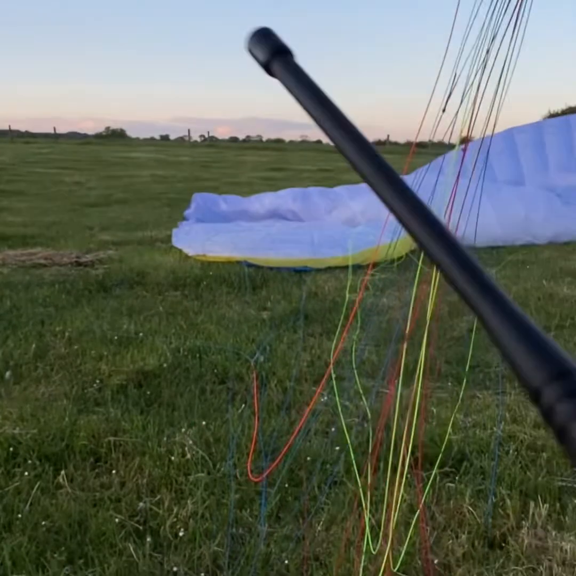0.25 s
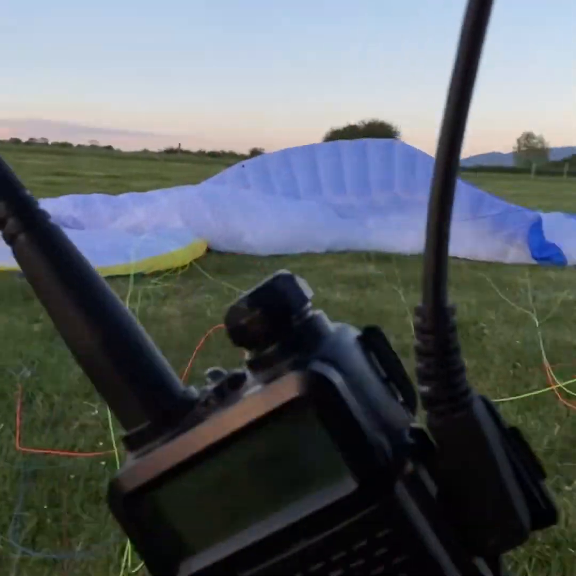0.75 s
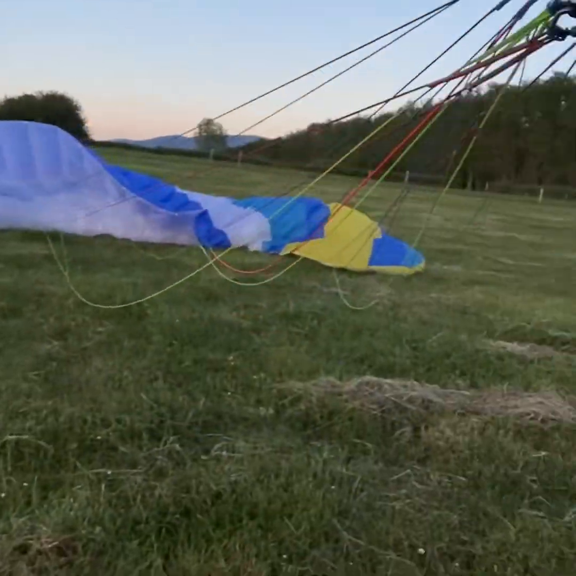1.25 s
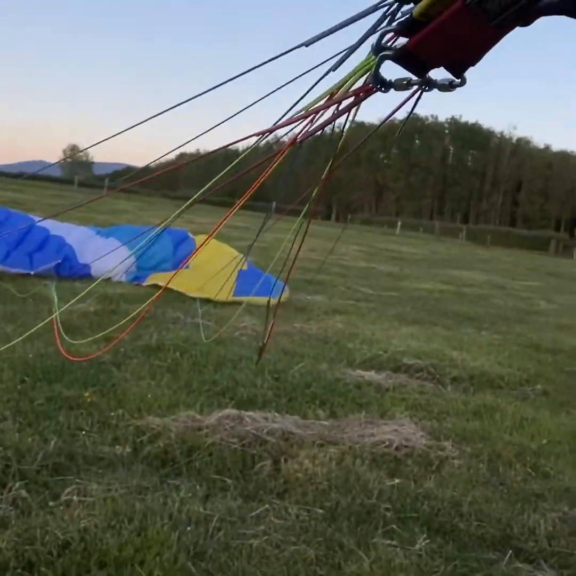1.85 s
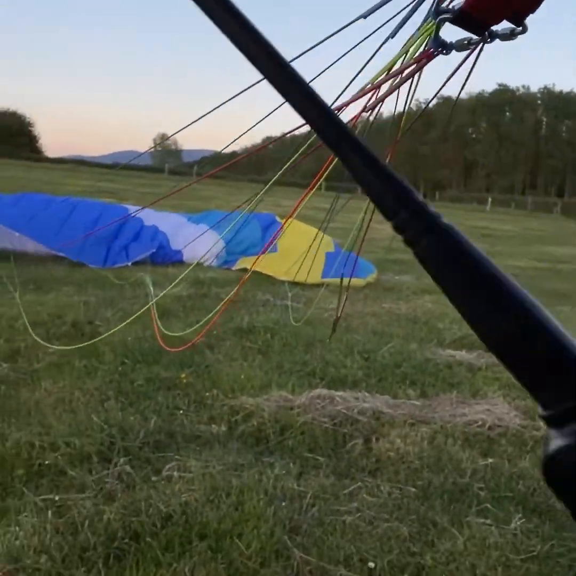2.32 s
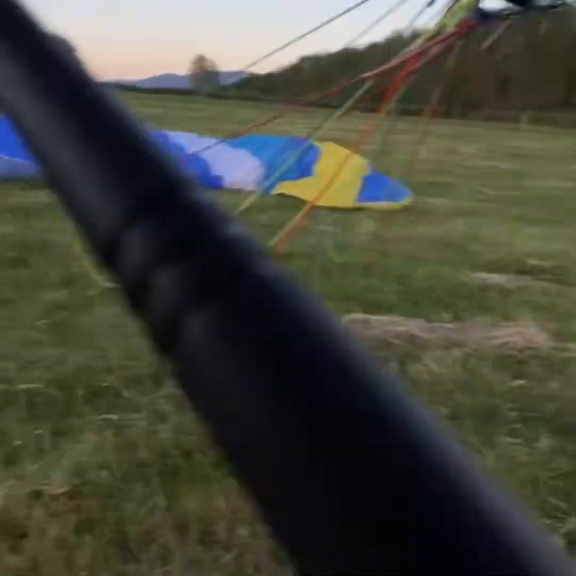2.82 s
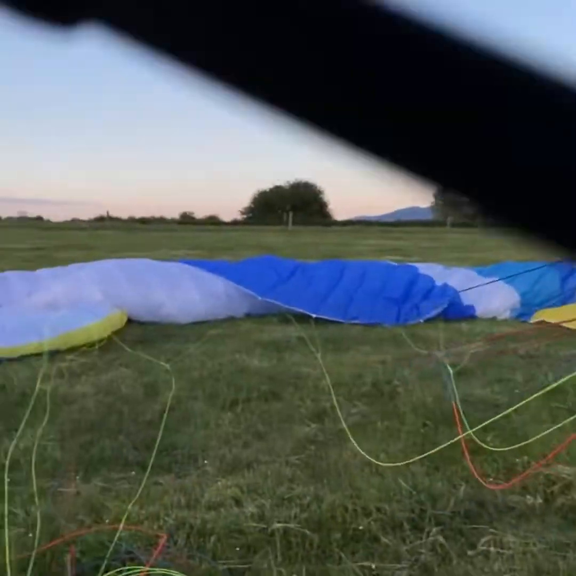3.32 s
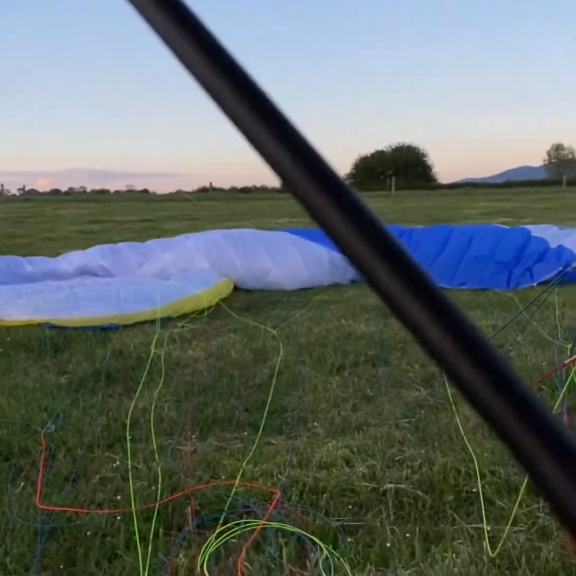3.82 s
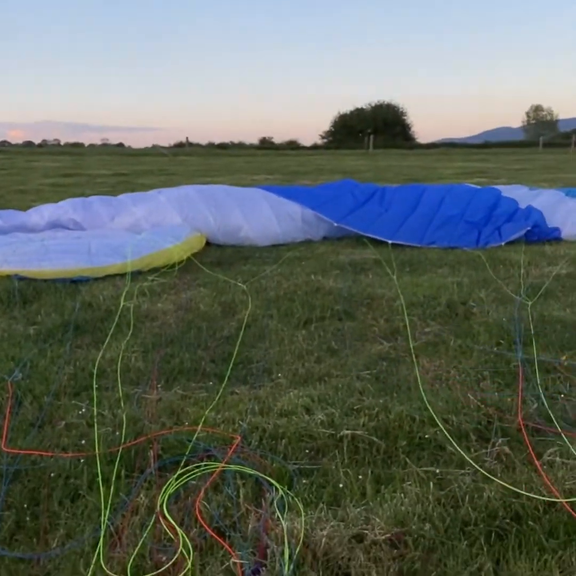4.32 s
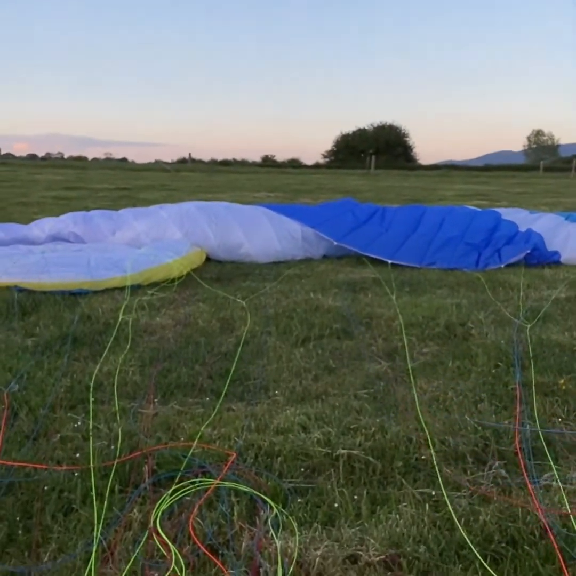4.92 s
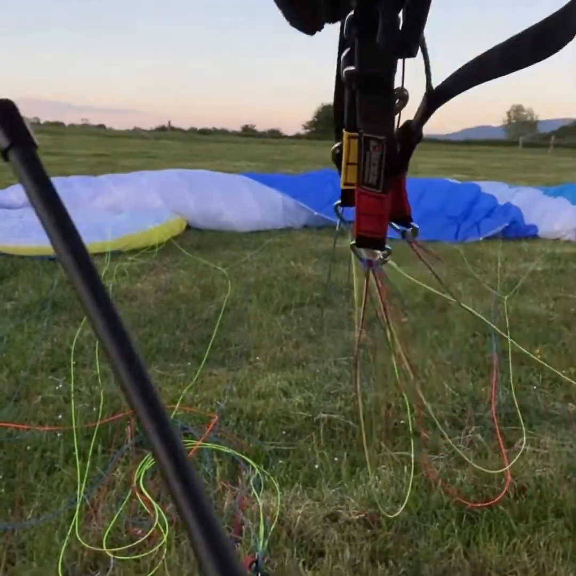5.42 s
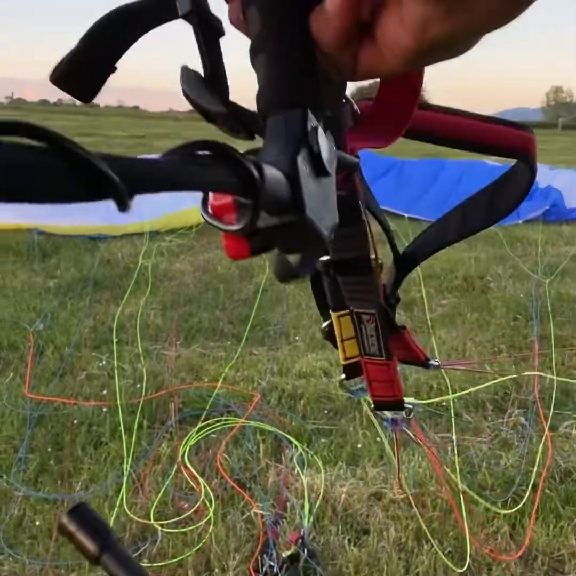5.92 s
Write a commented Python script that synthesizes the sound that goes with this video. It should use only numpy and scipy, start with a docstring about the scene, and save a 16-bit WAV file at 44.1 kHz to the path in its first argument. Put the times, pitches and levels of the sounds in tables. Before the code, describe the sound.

Dry outdoor close-up of harness handling in stereo. Soft fabric rustle and low rumble run throughout over a faint throbbing motor tone. A burst of clicks comes early, then two loud knock clusters with rattling hardware, a single sharp tick and a bright metal clip snap. Quieter afterwards: muffled uneven thuds as the engine bogs down, a soft brush, tiny pings, and the hum climbing back at the end.

```python
"""Harness straps and buckles are handled right at a camera while a small engine on its frame idles unevenly.
From the start webbing rubs and cloth rustles, made of lumpy noise; the engine is a sum of wavering sines.
Soon buckles tick, cloth brushes past and knocks sweep down through the frame: ringing noise and falling tones.
Later a steel gate snaps shut in a few noisy contacts. The engine bogs down twice, each firing jerking the
frame, then picks up again. Loud treble makes the camera turn its gain down for a moment."""
import sys
import numpy as np
from scipy import signal
from scipy.fft import rfft, irfft, next_fast_len
from scipy.io import wavfile
from scipy.ndimage import uniform_filter1d, minimum_filter1d, map_coordinates

SR = 44100
rng = np.random.default_rng(int(sys.argv[2]) if len(sys.argv) > 2 else 0)


def digitize_waveform(pressure):
    """Quantize a signal to 16-bit integers and store it at the path in sys.argv[1].

    Rows of a 2-D input are taken as channels; values are limited to [-1, 1].
    """
    field = np.atleast_2d(pressure).T
    bounded = np.clip(field, -1, 1)
    quanta = np.round(bounded * 32767).astype(np.int16)
    wavfile.write(sys.argv[1], SR, quanta)


N = 271656

# how loudly cloth moves, before its uneven pull: t/s, rustle level/dB, sheen level/dB
CLOTH_LEVEL = [(0, -50, -66), (.4, -56.5, -68), (1.1, -51.5, -60.5), (1.78, -54, -65.5),
               (2.3, -58.5, -70.5), (2.9, -52, -60), (3.55, -54.5, -70), (3.95, -55.5, -63),
               (4.6, -57.5, -69.5), (5.2, -54, -60.5), (6.16, -52.5, -64.5)]


def amp(db):
    """Turn decibels into a factor on the sound pressure."""
    return 10 ** (np.asarray(db) / 20)


def unit(x):
    """Scale a sound to an rms of 1."""
    return x / np.sqrt(np.mean(x ** 2) + 1e-20)


def along(points, hz):
    """Read a curve of (f/Hz, value) points on a log pitch axis."""
    f, v = np.transpose(points)
    return np.interp(np.log(hz + 1), np.log(f + 1), v)


def curves(rows):
    """Give one value per sample for each column after the time."""
    s, *cols = np.transpose(rows)
    return [np.interp(np.arange(N) / SR, s, c) for c in cols]


def wobble(rate, size=N):
    """Draw a smooth random curve with rate knots a second."""
    knots = rng.standard_normal(int(size * rate / SR) + 4)
    return map_coordinates(knots, [np.arange(size) * rate / SR])


def filtered(x, response):
    """Shape the spectrum of x by a complex response of frequency."""
    m = next_fast_len(x.shape[-1] + 2048)
    spectrum = rfft(x, m) * response(np.fft.rfftfreq(m, 1 / SR))
    return irfft(spectrum, m)[..., :x.shape[-1]]


def band(hz, width):
    """Make the response of one resonance; width is a share of its pitch."""
    return lambda f: 1j * f * hz * width / (hz * hz - f * f + 1j * f * hz * width)


def add(out, s, sound):
    """Mix a short stereo sound in at s seconds."""
    part = out[:, round(s * SR):][:, :sound.shape[1]]
    part += sound[:, :part.shape[1]]


def ports(x, alike):
    """Two microphone ports hear a shared part, turned in phase, and the right also hears a part of its own."""
    # how far the left port leads the right: f/Hz, phase/rad
    port_lead = [(100, 0.5), (300, -0.74), (1100, -2), (1800, 0.5), (2900, -2), (3800, 0.5), (5200, -2),
                 (6500, 0.66), (11000, -2), (12500, -4)]
    share = np.clip(alike, 0, 1)
    right = share * x[0] + np.sqrt(1 - share ** 2) * x[1]
    pair = np.array([x[0], right])
    half_each = np.array([[1], [-1]])
    return filtered(pair, lambda hz: np.exp(.5j * along(port_lead, hz) * half_each))


def rush(spectrum, alike, grain_db, grain_rate):
    """Many small rubs blur into stereo noise of rms 1, lumpy at grain_rate a second; no lump stands far out."""
    lumps = amp(2 * grain_db * np.tanh(wobble(grain_rate) / 2))
    noise = rng.standard_normal((2, N)) * lumps
    coloured = filtered(noise, lambda hz: amp(along(spectrum, hz)))
    return unit(ports(coloured, alike))


def handling():
    """Webbing drags on the frame (rumble, rub) and on cloth (rustle, sheen), all with one uneven pull."""
    # shape of each layer's noise, from deep to bright: f/Hz, level/dB
    rumble_shape = [(25, -21), (60, -1), (110, -5.5), (160, -7.5), (320, -20.5), (500, -55)]
    rub_shape = [(120, -120), (200, -5.5), (450, -4), (750, -7.5), (1100, -12), (2000, -120)]
    rustle_shape = [(300, -120), (700, -3.5), (1500, 0), (3000, -2.5), (4500, -6.5), (6000, -20.5),
                    (9000, -120)]
    sheen_shape = [(2500, -120), (4500, -4.5), (6000, -5), (9000, -8), (11000, -7.5), (11800, -5.5),
                   (12900, -120)]
    # rumble before the uneven pull; it drops when the harness settles: t/s, level/dB
    rumble_level = [(0, -46.5), (.65, -46.5), (1.1, -42), (2.3, -42.5), (2.5, -52), (3.3, -53.5),
                    (4.2, -55.5), (4.6, -51.5), (6.16, -48.5)]
    # rub before the uneven pull: t/s, level/dB
    rub_level = [(0, -45.5), (.65, -48), (1.1, -49.5), (1.6, -51), (1.78, -53), (2.5, -59), (3.3, -56.5),
                 (4.2, -64), (4.6, -55.5), (5.8, -50.5), (6.16, -51.5)]
    rumble_db, = curves(rumble_level)
    rub_db, = curves(rub_level)
    rustle_db, sheen_db = curves(CLOTH_LEVEL)
    drag = np.tanh(wobble(21.897))
    rumble = amp(rumble_db + 1.1 * drag) * rush(rumble_shape, .8, 2.2, 30)
    rub = amp(rub_db + 1.3 * drag) * rush(rub_shape, 1.0, 3.6, 90)
    rustle = amp(rustle_db + 2.75 * drag) * rush(rustle_shape, 0.23, 2.07, 250)
    sheen = amp(sheen_db + 2.3 * drag) * rush(sheen_shape, 0.89, 2.7, 300)
    return (rumble + rub + rustle + sheen) * amp([[.8], [-.8]])  # left a little louder, dB


def engine(rows, upper_db):
    """Multiples of the shaft's turning sound; good firing only every few turns makes them throb and waver."""
    # tones of the shaft, before the odd and upper ones are shifted: multiple of the turning rate, level/dB
    shaft_tones = [(1, -12), (2, -1), (3, -3), (4, -3.5), (5, -9.5), (6, -10)]
    odd_db = -2.5  # shift of the odd multiples
    turns_hz, level_db = curves(rows)
    t = np.arange(N) / SR
    since_start = t - rows[0][0] + 0.046
    until_end = rows[-1][0] + 0.038 - t
    running = np.clip(np.minimum(since_start, until_end) / 0.074, 0, 1)  # fades in and out
    shaft = 2 * np.pi * np.cumsum(turns_hz) / SR + 0.38 * wobble(9)
    throb = np.sin(shaft / 4.6 + 0.88 * wobble(2.6))  # one swell in about 4.6 turns
    tone = np.zeros(N)
    for k, db in shaft_tones:
        tone_db = db + odd_db * (k % 2) + (k > 3) * upper_db
        throb_db = 1.37 * k * throb * amp(upper_db)  # higher multiples throb more
        waver_db = 2.5 * wobble(8.7)
        tone += amp(tone_db + throb_db + waver_db) * np.sin(k * shaft + rng.uniform(0, 2 * np.pi))
    return np.sqrt(2) * running * amp(level_db) * tone


def ticks():
    """A struck small part rings: a crack of noise passes through its resonance, broader for hard strikes."""
    # buckle and cable ticks: t/s, level/dB, f/Hz
    buckle_ticks = [(.618, -35.5, 1010), (.6985, -26, 3000), (0.7055, -31, 1490), (0.71, -19.5, 5640),
                    (0.7135, -21, 2220), (1.2317, -29, 3880), (1.276, -30, 4600), (1.2889, -27, 4760),
                    (1.3547, -28, 2960), (1.692, -33, 6416), (1.8297, -27.5, 1930), (1.8392, -15, 1750),
                    (1.8388, -20, 4260), (1.8702, -27.5, 4530), (1.8937, -27.5, 1800),
                    (1.9643, -25.5, 2460), (2.0173, -31.5, 2426), (2.153, -28.5, 4050), (2.484, -37, 6500),
                    (2.591, -29, 4400), (2.6938, -18, 1336), (2.6955, -24.5, 3300), (2.6975, -29, 6500),
                    (2.722, -36, 4500), (2.73, -19.5, 2900), (2.7895, -36, 4000), (2.7945, -27.5, 2380),
                    (2.806, -30, 4200), (2.816, -29, 4400), (2.819, -30, 1610), (2.8549, -27.5, 2060),
                    (2.8694, -27, 6010), (2.968, -29.5, 5150), (3.145, -28.5, 5370), (3.2004, -28, 3930),
                    (3.4462, -14, 2698), (3.5162, -32.5, 4200), (3.9609, -31.5, 2100), (4.1594, -32, 3900),
                    (5.094, -32, 4700), (5.2945, -29, 4800), (5.3305, -27, 7700), (5.5458, -34, 1650),
                    (5.7853, -35.5, 2150), (6.0026, -30.5, 2260), (6.101, -33.5, 1390),
                    (6.117, -32.5, 2335)]
    # small metal parts that ring: t/s, level/dB, f/Hz
    pings = [(4.9615, -32, 9700), (4.985, -27, 4370), (5.0135, -40, 7200)]
    # loose hardware that chatters: t/s, length/s, starting level/dB
    rattles = [(0.719, .085, -32), (1.846, .075, -26.5), (5.961, .18, -38.5)]
    tick_width, ping_width = 0.9, 0.19  # shares of the pitch
    rattle_fade_db = 11  # loss over a rattle, before a random extra loss
    hard_db = -15.5  # ticks above this are bare, broad strikes
    out, t = np.zeros((2, N)), np.arange(SR // 30) / SR

    # fainter ticks fall by chance and follow the sheen of the cloth
    u = rng.random((90, 3))
    faint_s = u[:, 0] * N / SR
    sheen_db = np.interp(faint_s, *np.transpose(CLOTH_LEVEL)[::2])
    faint_db = sheen_db + 17 + 9 * u[:, 1] ** 2
    faint = np.transpose([faint_s, faint_db, 1300 * 7.2 ** u[:, 2]])

    loose = []
    for s, length, db in rattles:
        for a, b, c in rng.random((14, 3)):
            loose.append((s + length * a, db - rattle_fade_db * (a + b / 2), 1400 * 4 ** c))

    strikes = [(*row, tick_width) for row in [*buckle_ticks, *faint, *loose]]
    strikes += [(*row, ping_width) for row in pings]
    for s, db, hz, width in strikes:
        crack = rng.standard_normal((2, len(t))) * amp(-60 * t / 0.0083)
        crack *= 1 - np.exp(-(t / 0.00077) ** 2)
        hard = max(db - hard_db, 0)
        crack += (1.67 + 2.5 * hard) * (np.arange(len(t)) == SR // 1000)  # the strike itself, inside its scuff
        resonance = band(hz, width + .1 * hard)
        body = filtered(crack, lambda f: (resonance(f) ** 2 + 0.11 * (f > 1200)) / (1 + (f / 12500) ** 8))
        pair = ports(body, 0.47)
        add(out, s, amp(db) * pair / np.abs(pair).max() * amp([[1.2], [-1.2]]))
    return out


def brushes():
    """Webbing and cloth brush past, and from 1.3 to 1.6 s a part on the frame rattles in step with every third
    engine turn; near 4.9 s the engine's returning firings blur into a swell. Grainy noise swells and dies
    around one pitch, with little above it."""
    # strokes, the rattles near 1.3-1.6 s and the firing swell near 4.9 s: t/s, rise/s, time to fall by 60 dB/s,
    # level/dB, centre f/Hz
    strokes = [(.672, 0.035, 0.12, -39, 3520), (.69, 0.019, 0.38, -42.5, 6500),
               (.822, 0.029, 0.076, -38, 560), (0.978, 0.0049, 0.094, -42, 610),
               (1.304, 0.013, 0.13, -38.5, 485), (1.368, 0.013, 0.13, -37, 497),
               (1.45, 0.0079, 0.062, -40, 550), (1.514, 0.0099, 0.16, -40, 550),
               (1.596, 0.0067, 0.2, -36.5, 540), (1.848, 0.0058, 0.11, -24, 970),
               (1.838, 0.008, 0.17, -33.5, 2900), (3.44, 0.0087, 0.048, -40, 506),
               (3.48, 0.013, 0.059, -41.5, 780), (4.69, 0.044, 0.62, -49, 257),
               (4.92, 0.062, 0.54, -42.5, 210), (4.885, .11, 0.45, -39.5, 435),
               (5.589, 0.023, 0.033, -39.5, 464), (5.69, 0.038, 0.22, -49, 6960)]
    out, t = np.zeros((2, N)), np.arange(SR // 3) / SR
    for s, rise, t60, db, hz in strokes:
        grains = rng.standard_normal((2, len(t))) * amp(4 * np.tanh(wobble(260, size=len(t)) / 1.5))
        body = filtered(grains, lambda f: band(hz, 1.3)(f)
                        / (1 + (f / (1.71 * hz)) ** 6) / (1 + (f / 12500) ** 20))
        swell = np.clip(t / rise, 0, 1) ** 2 * amp(-60 * np.maximum(t - rise, 0) / t60)
        add(out, s, amp(db) * unit(ports(body, 0.99)) * swell * amp([[.7], [-.7]]))
    return out


def bend(t, hz, fall, t60):
    """A bending wave in the frame: high pitches arrive first, so the blow sweeps downward."""
    settle = 0.36  # share of the first pitch that a blow settles on
    t = np.maximum(t, 0)
    cycles = hz * (settle * t + (1 - settle) * fall * np.arctan(t / fall))
    return np.sin(2 * np.pi * cycles) * amp(-60 * t / t60) * (1 - np.exp(-t / 0.00092))


def knocks():
    """Blows on the frame reach the ports along different paths, with an echo from a joint and a noisy rattle."""
    # blows: t/s, level/dB, first f/Hz, time to fall by 60 dB/s, lag of the right port/ms
    blows = [(0.713, -26.5, 264, 0.038, 0.12), (.73, -34, 437, 0.054, -0.079),
             (.86, -35.5, 121, 0.11, 0.098), (.889, -26.5, 60, 0.17, -0.079),
             (0.942, -24, 82.7, 0.054, -0.014), (.985, -37.5, 100.5, 0.31, 0.055),
             (1.844, -19, 250, 0.03, -0.21), (1.8534, -12, 323, 0.02, -0.011), (1.8575, -10, 167, 0.036, 0),
             (1.8661, 0.5, 178, 0.014, -0.31), (1.88, -19, 96, 0.11, -0.36),
             (2.6909, -20.5, 644, 0.06, 0.54), (2.695, -4, 560, 0.021, 0.8), (2.6982, -2, 290, 0.013, 0.93),
             (2.7026, -10.5, 119, 0.024, 0.65), (2.732, -26, 477, 0.03, 0.69),
             (2.795, -24, 517, 0.027, 0.53), (2.799, -27.5, 176, 0.07, 0.2), (2.819, -19, 538, 0.024, 0.77),
             (2.824, -14, 191, 0.014, 0.2), (3.972, -40.5, 224, 0.025, -0.097)]
    fall_s, deep_hz = 0.0074, 160  # basic time of the pitch fall; blows deeper than deep_hz fall far more slowly
    out, t = np.zeros((2, N)), np.arange(SR // 5) / SR
    for s, db, hz, t60, lag_ms in blows:
        fall = fall_s * (1 + (deep_hz / hz) ** 2)
        late = t - np.array([[1 - lag_ms / 2], [1 + lag_ms / 2]]) / 1000
        wave = bend(late, hz, fall, t60)
        echo_delay = rng.uniform(0.0017, 0.00686, (2, 1))  # s, unlike at each port
        echo = 0.41 * bend(late - echo_delay, 0.764 * hz, fall, t60)
        noise = rng.standard_normal((2, len(t)))
        rattle = unit(filtered(noise, lambda f: band(1.6 * hz, 1.2)(f) ** 3))
        rattle *= amp(-60 * t / (0.38 * t60)) * (1 - np.exp(-t / 0.0022))
        add(out, s, -amp(db + 7.5) * (wave + echo + 0.32 * rattle))
    return out


def snap():
    """A steel gate touches, strikes, chatters and settles; each contact also rings it briefly."""
    # contacts of the gate: t/s, level/dB, time to fall by 60 dB/s
    contacts = [(3.593, -45, 0.0056), (3.6, -22, 0.006), (3.6023, -8.5, 0.0067), (3.603, -30.5, 0.09),
                (3.6076, -15.5, 0.014), (3.614, -23, 0.0087)]
    # colour of the steel's noise: f/Hz, level/dB
    steel_shape = [(470, -66.5), (800, -24), (1420, -26.5), (2440, -10.5), (2730, -6), (4180, 0.5),
                   (4740, -1), (7080, -0.5), (8660, -7), (11000, 3), (12100, -0.5), (13400, 2),
                   (16000, -38)]
    gate_hz = 4400  # pitch of the ring
    clatter, ring, t = np.zeros((2, N)), np.zeros((2, N)), np.arange(SR // 10) / SR
    for s, db, t60 in contacts:
        noise = np.sign(rng.standard_normal((2, len(t))))
        add(clatter, s, amp(db - 2.5) * noise * amp(-60 * t / t60))
        tone = np.sin(2 * np.pi * gate_hz * t) * amp(-60 * t / 0.0051)
        add(ring, s, amp(db - 9) * tone * np.ones((2, 1)))
    steel = filtered(clatter, lambda hz: amp(along(steel_shape, hz)))
    return ports(ring + 3.4 * steel, 0.78)


def firings(rows):
    """The engine fires (t/s, level/dB, f/Hz) whenever its running count of firings passes a whole number."""
    scatter = 0.22  # share by which the pitch varies
    s, rate, db, hz = np.transpose(rows)
    t = np.arange(s[0], s[-1], 1 / SR)
    count = np.cumsum(np.interp(t, s, rate)) / SR
    at = np.interp(np.arange(int(count[-1]) + 1), count, t)
    pitch = np.interp(at, s, hz) * (1 + scatter * rng.uniform(-1, 1, len(at)))
    return np.transpose([at, np.interp(at, s, db), pitch])


def jerks():
    """As the engine bogs down, each lone firing jerks the frame: a main blow, two delayed ones and noise."""
    # two spells of bogging down: t/s, firings per second, level/dB, base f/Hz
    bog_spells = [
        [(4.031, 33.4, -49, 140), (4.2, 26.5, -43, 136), (4.325, 29, -39, 169)],
        [(4.379, 33.7, -37, 160), (4.47, 22.7, -32.5, 198), (4.69, 23.3, -32, 224.5)],
    ]
    out, t = np.zeros((2, N)), np.arange(SR // 5) / SR
    for s, db, hz in np.concatenate([firings(rows) for rows in bog_spells]):
        jerk = bend(t, 1.27 * hz, 0.024, 0.051)
        jerk += 0.5 * bend(t - .011, 1.0 * hz, 0.016, 0.039)
        jerk += 0.41 * bend(t - .004, 2.3 * hz, 0.034, 0.032)
        noise = unit(filtered(rng.standard_normal(len(t)), lambda f: band(1.9 * hz, 1.2)(f) ** 2))
        jerk += 0.34 * noise * np.clip(t / 0.0071, 0, 1) * amp(-60 * t / 0.045)
        add(out, s, amp(db + 0.5) * jerk * amp([[.7], [-.7]]))
    return out


def scene():
    """Add up the handling, the engine and the blows."""
    # engine idling, then picking up: t/s, shaft turns f/Hz, level/dB
    idle = [(0, 39.85, -47.5), (1.2, 39.78, -50), (2.38, 39.38, -47.5), (2.52, 39.5, -63), (3.75, 37, -66)]
    pickup = [(4.83, 29.07, -64), (5.2, 32.38, -47.5), (5.55, 34.88, -56), (5.85, 39.8, -48.5),
              (6.16, 44, -44)]
    idle_upper_db, pickup_upper_db = 0.75, -15  # shift of the multiples above the third
    motor = engine(idle, idle_upper_db) + engine(pickup, pickup_upper_db)
    return handling() + motor + ticks() + brushes() + knocks() + snap() + jerks()


def record(dry):
    """Loud treble turns the camera's gain down briefly; peaks are rounded, deep bass and the top are cut."""
    duck_hz, duck_above_db, duck_slope = 3000, -27, 1.29  # treble starts here; threshold; dB cut per dB over it
    hold_s, ease_s, recover_db_per_s = 0.052, 0.0098, 95
    ceiling, top_hz = .85, 16600
    treble = filtered(dry, lambda hz: hz > duck_hz)
    power = uniform_filter1d(np.mean(treble ** 2, 0), size=SR // 40)
    level_db = 10 * np.log10(np.abs(power) + 1e-12)
    hold = round(hold_s * SR)
    cut_db = minimum_filter1d(-duck_slope * np.maximum(level_db - duck_above_db, 0), hold)
    ramp_db = recover_db_per_s * np.arange(N) / SR
    cut_db = np.minimum(np.minimum.accumulate(cut_db - ramp_db) + ramp_db, 0)  # the gain creeps back
    keep = np.exp(-1 / (ease_s * SR))
    delayed_db = np.pad(cut_db, (hold // 2 + SR // 80, 0))[:N]  # the gain cannot act ahead of the sound
    gain_db = signal.lfilter([1 - keep], [1, -keep], delayed_db)
    ducked = dry * amp(gain_db)
    rounded = ducked / (1 + np.abs(ducked / ceiling) ** 6) ** (1 / 6)
    return filtered(rounded, lambda hz: (1j * hz / (30 + 1j * hz)) ** 4 * (hz < top_hz))


dry = scene()
out = record(dry)
digitize_waveform(out)
```